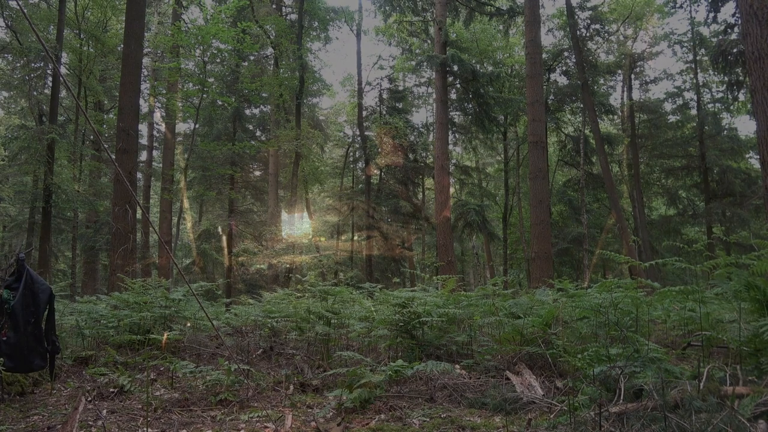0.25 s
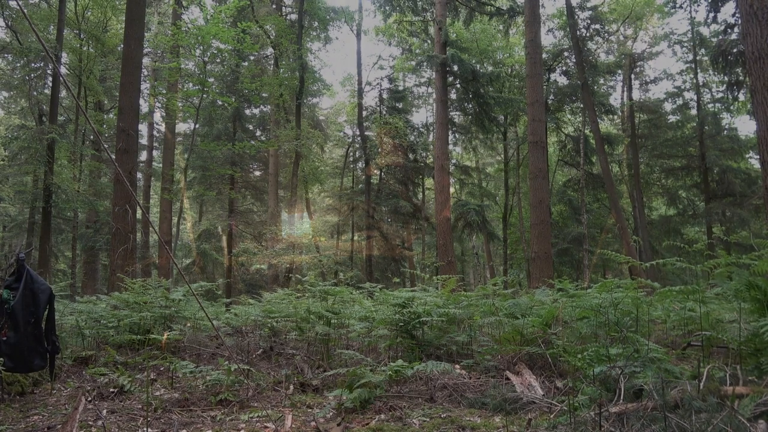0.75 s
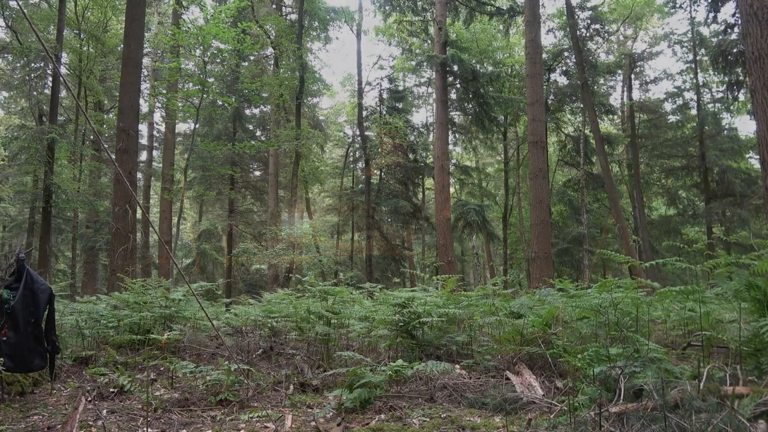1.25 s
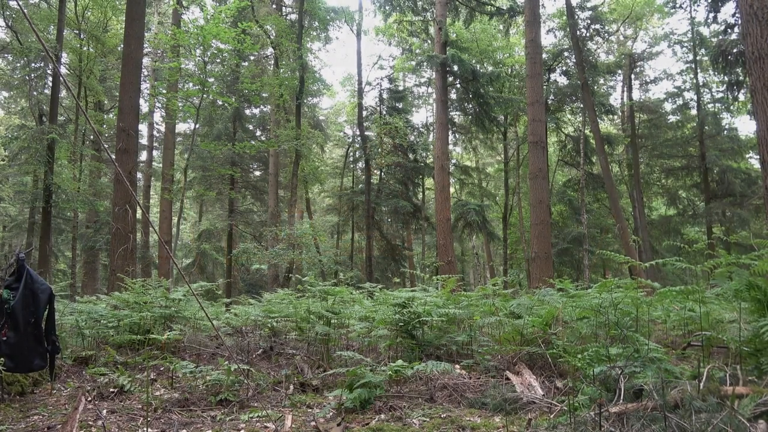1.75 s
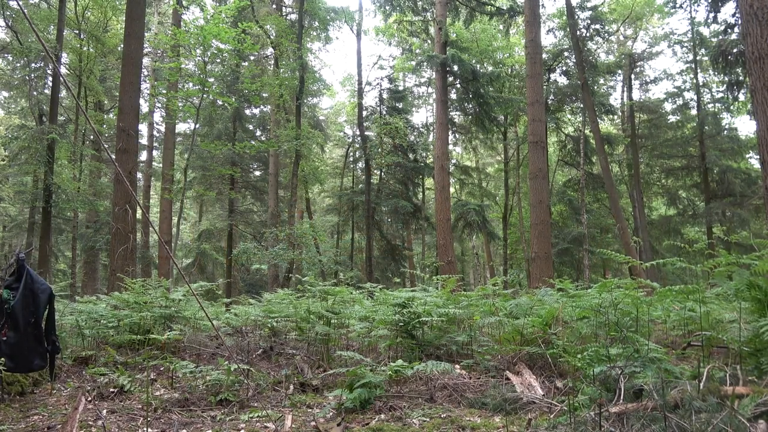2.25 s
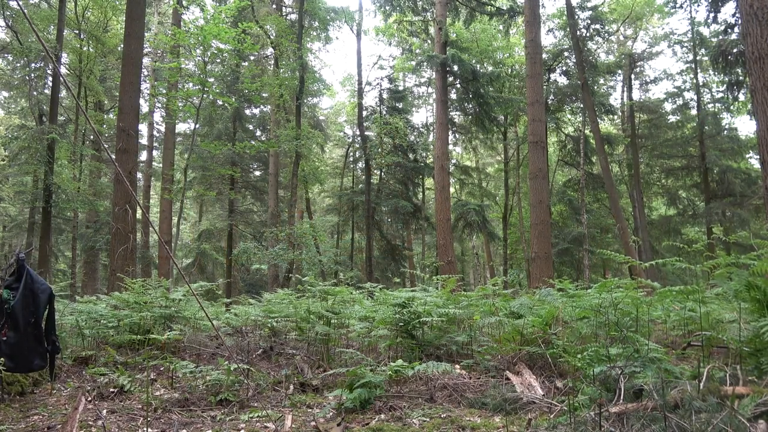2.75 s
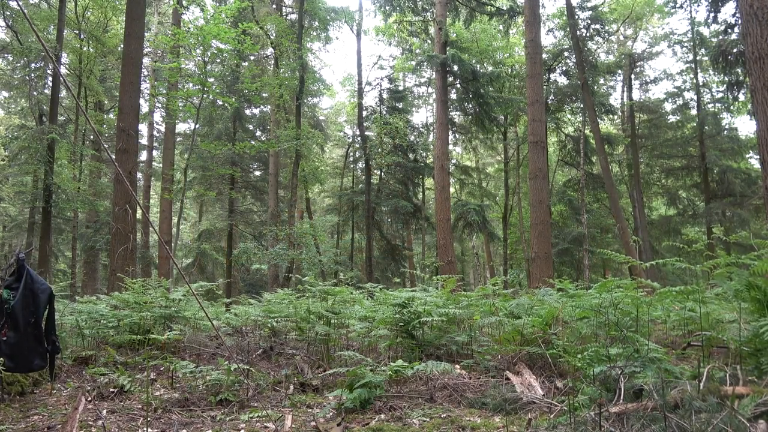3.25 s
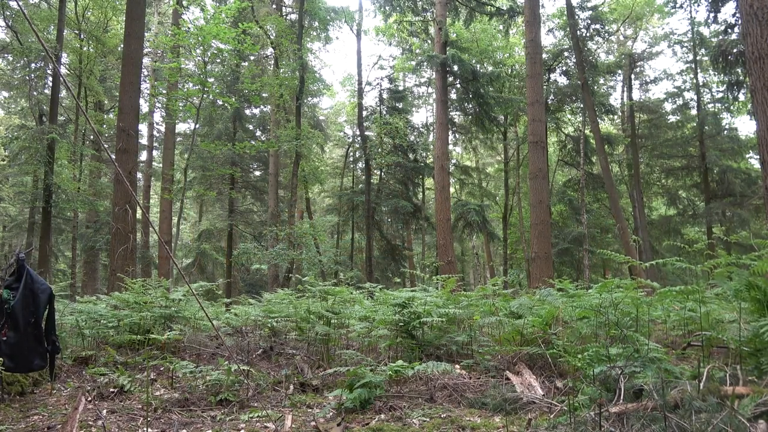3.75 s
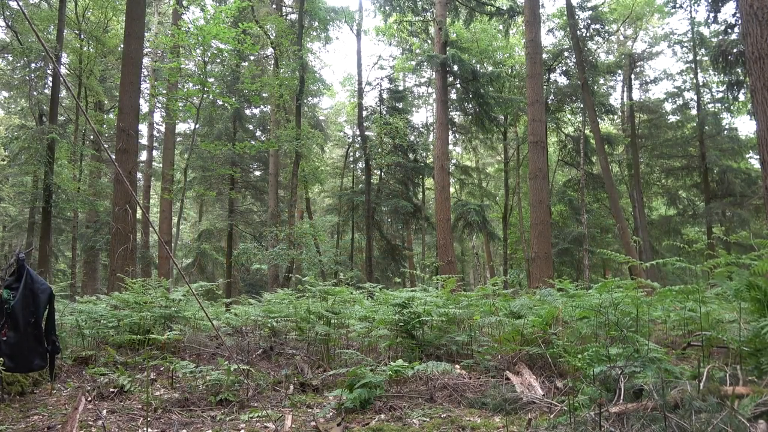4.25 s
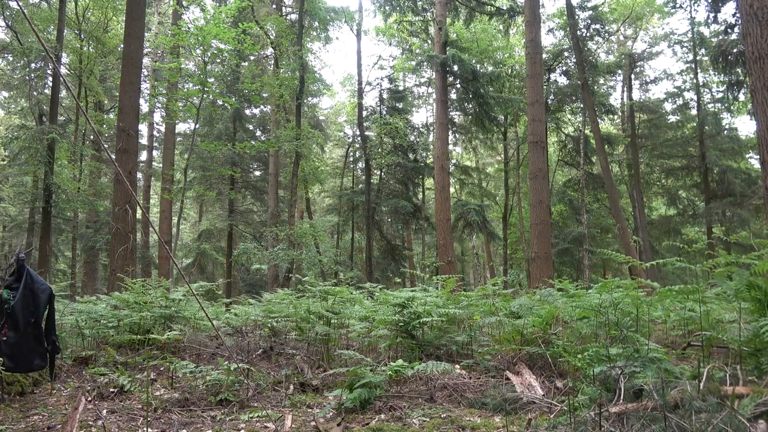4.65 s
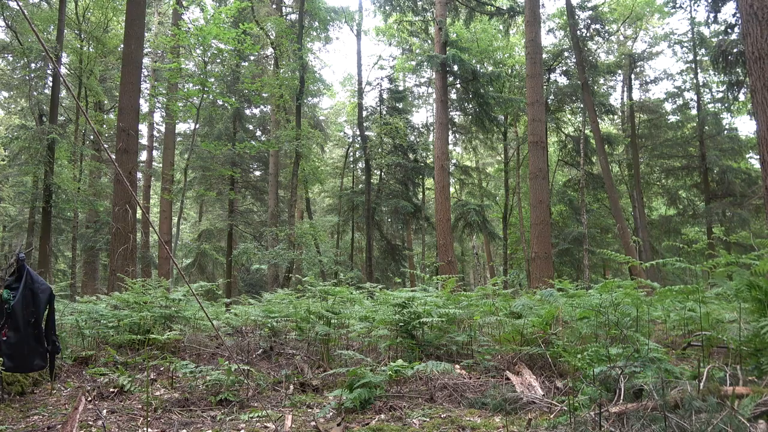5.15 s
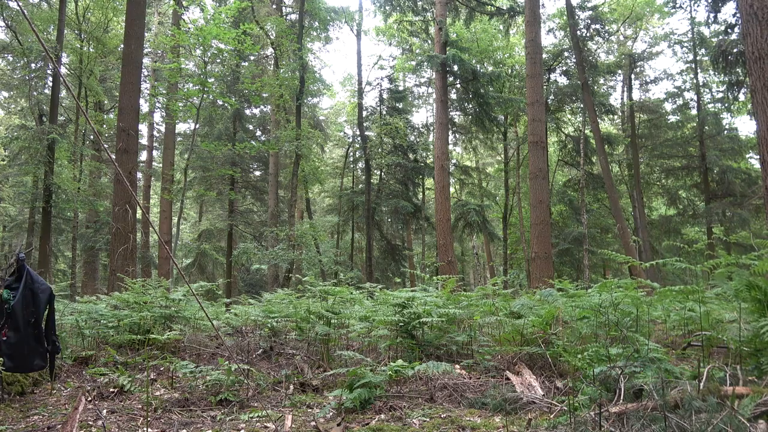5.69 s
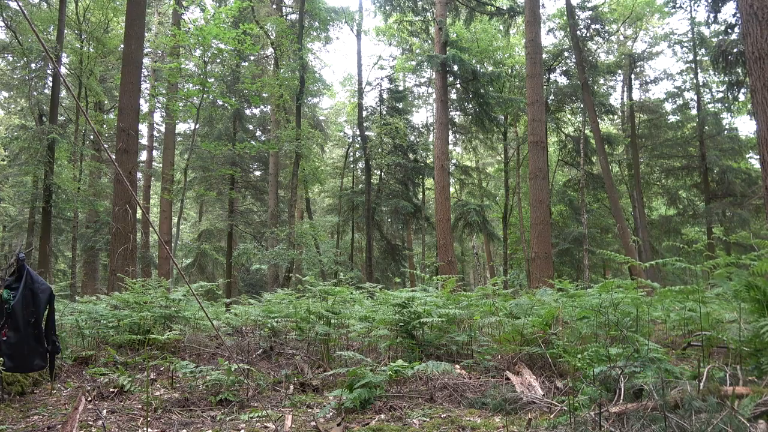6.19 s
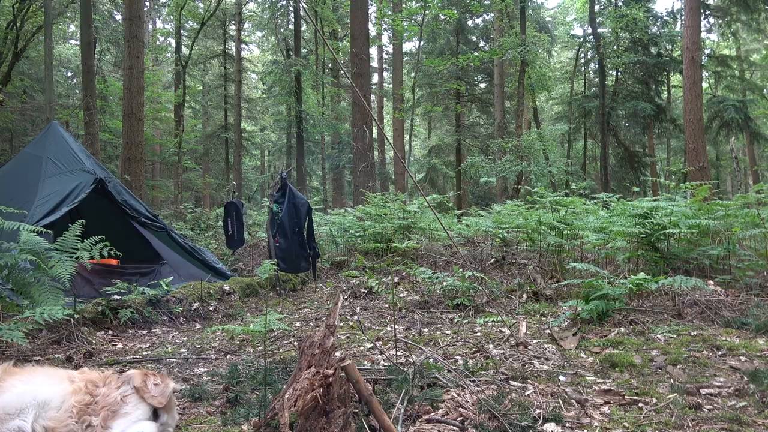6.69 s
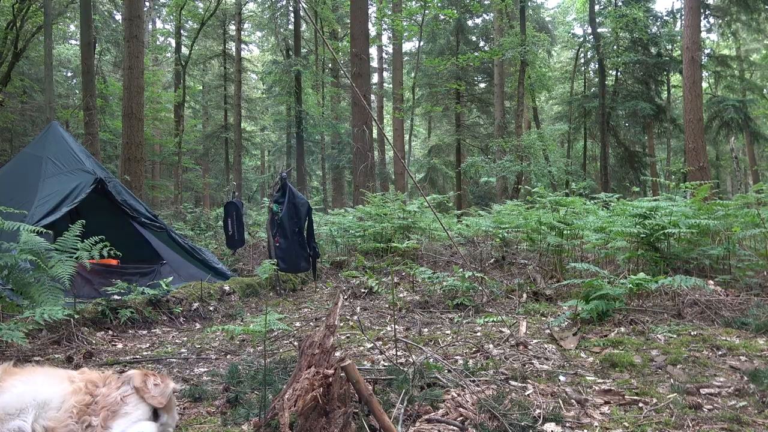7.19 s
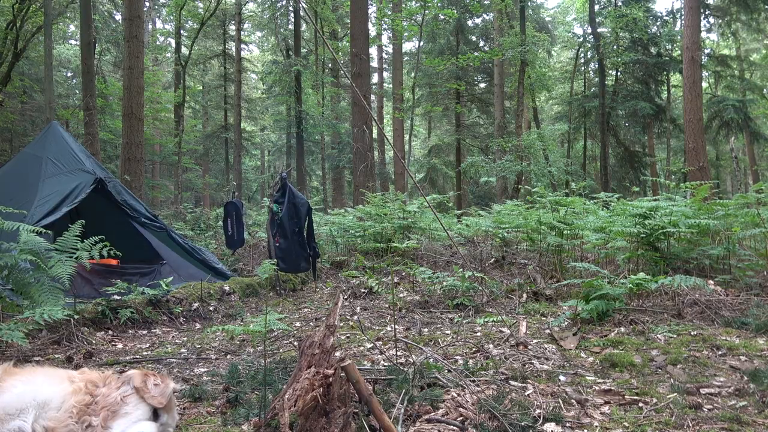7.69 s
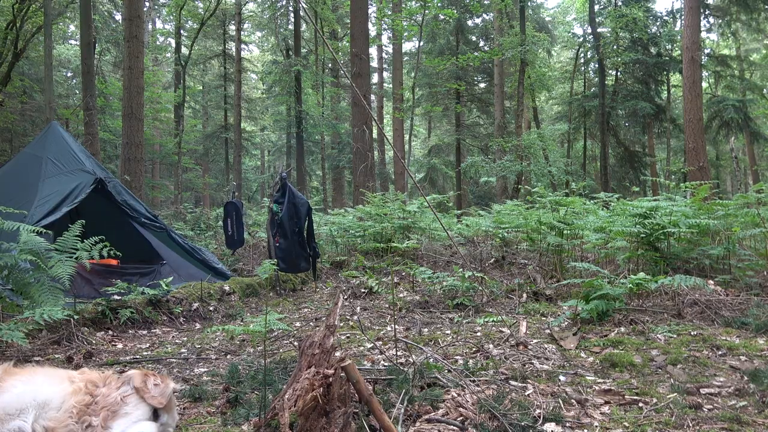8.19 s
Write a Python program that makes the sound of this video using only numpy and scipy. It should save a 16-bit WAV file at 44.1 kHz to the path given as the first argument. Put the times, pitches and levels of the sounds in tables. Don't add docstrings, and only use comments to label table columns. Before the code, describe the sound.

Wide outdoor stereo of calm woodland: low distant traffic hum and airy hiss rise gently at first. A remote cuckoo calls steadily, a short higher note then a longer lower one, with soft echoes. Irregular crisp drips tap leaves close by, thin clear whistles come from a small bird, and soft wind puffs nudge the microphone. Rapid distant chirps and trills cluster in the last second.

```python
import sys
import numpy as np
from scipy import signal
from scipy.io import wavfile
from scipy.ndimage import uniform_filter1d

SR = 44100
rng = np.random.default_rng(int(sys.argv[2]) if len(sys.argv) > 2 else 0)


def gain_from_decibels(decibels):
    exponent = np.asarray(decibels, float) / 20
    return 10 ** exponent


def output_pcm(signal):
    pcm = np.clip(np.atleast_2d(signal).T, -1, 1) * 32767
    wavfile.write(sys.argv[1], SR, np.round(pcm).astype(np.int16))


N = 371763

# (frequency [Hz], density [dB per Hz])
AIR_SPECTRUM = [(12, -10), (25, -3.5), (60, -1.5), (110, 1.5), (170, -5.5), (300, -6), (450, -3.5),
                (750, -1.5), (1200, -1), (1700, -8.5), (2400, -12), (3400, -17.5), (7000, -21.5),
                (15500, -25)]
# (frequency [Hz], side minus centre [dB])
AIR_WIDTH = [(25, 1), (45, -5), (100, -18), (200, -7.5), (380, -9), (700, -12.5), (1290, -15.5),
             (2380, -5.5), (4400, 0.5), (15000, 1.8)]
# (frequency [Hz], share of the swell [0-1])
ROAD_SHARE = [(30, .4), (130, .8), (300, .25), (1200, 1), (3000, .72), (7000, .05)]
# (time [s], level [dB])
TRAFFIC = [(0, -.8), (1, .8), (1.4, -.3), (2.1, .3), (2.8, -2.4), (3.6, .4), (4.3, .3), (5.1, -1.6),
           (5.8, .6), (6.5, 1.6), (7.3, 1.4), (8.1, 2.8), (8.43, 3.6)]

# (delay [s], level [dB])
TRUNK_ECHOES = [(.032, -16), (.088, -13.5), (.205, -15.5), (.46, -22)]
# (frequency [Hz], time to fall 60 dB [s])
WOOD_DECAY = [(300, 1.5), (1000, 1.3), (3500, .9), (4700, 1.25), (9000, .6)]

# (start [s], end [s], start pitch [Hz], end pitch [Hz], level [dB])
CLEAR_NOTES = [ (.039, .13, 3690, 4130, -71), (.096, .161, 4800, 4380, -73), (.28, .48, 3500, 3410, -72),
               (.25, .297, 4480, 4500, -74), (1.48, 1.545, 3750, 3950, -68), (6.346, 6.42, 3450, 3424, -66),
               (6.722, 6.8, 3270, 3230, -69), (7.658, 7.702, 3300, 3000, -59),
               (7.83, 7.92, 7325, 7340, -61.5), (7.895, 7.912, 4100, 3800, -53),
               (7.908, 8.012, 3765, 3740, -43.5), (8.282, 8.297, 8300, 8700, -63),
               (8.32, 8.34, 7600, 7520, -56), (8.334, 8.361, 7100, 6760, -53.5),
               (8.355, 8.38, 6500, 6000, -52), (8.38, 8.394, 5750, 5680, -51),
               (8.379, 8.42, 7600, 7600, -60), ]
# (start [s], end [s], start pitch [Hz], end pitch [Hz], level [dB])
BURRED_NOTES = [ (.161, .24, 3600, 3520, -68), (6.15, 6.206, 4270, 4170, -65),
                (6.259, 6.495, 4320, 4234, -59.5), (7.042, 7.238, 4100, 4170, -63),
                (7.065, 7.42, 4530, 4450, -60), (7.509, 7.575, 2970, 4120, -61),
                (7.688, 7.72, 3720, 4270, -54.5), (7.72, 7.784, 3650, 3850, -58),
                (7.7, 7.77, 2980, 2900, -62), (8.01, 8.04, 5380, 5250, -64),
                (8.029, 8.107, 4450, 4540, -52), (8.099, 8.158, 3880, 4040, -50),
                (8.308, 8.357, 4160, 4220, -54), (8.26, 8.323, 7800, 8150, -62),
                (8.385, 8.428, 6100, 6400, -57), (7.876, 7.887, 6700, 5400, -53), ]
# (start [s], end [s], start pitch [Hz], end pitch [Hz], level [dB])
TRILLED_NOTES = [ (.504, .62, 4300, 4140, -70.5), (.675, .743, 4510, 4300, -70.5),
                 (7.708, 7.81, 4390, 4410, -46), (7.81, 7.895, 4330, 4480, -51.5),
                 (8.035, 8.107, 3700, 3860, -52), (8.145, 8.225, 4030, 4190, -49.5),
                 (8.22, 8.307, 4220, 4160, -52), (8.133, 8.24, 3080, 3020, -61.5),
                 (7.883, 7.925, 5400, 5300, -54), ]
# (start [s], end [s], start pitch [Hz], end pitch [Hz], level [dB])
BUZZED_NOTES = [(5.9, 6.005, 3310, 2890, -67), (6.077, 6.251, 3010, 4190, -70),
                (7.559, 7.64, 3470, 4100, -63), (7.888, 7.93, 5950, 5750, -57),
                (8.246, 8.262, 6600, 4600, -58), (8.01, 8.36, 4000, 4300, -58),
                (.31, .325, 4800, 3300, -66)]
# (start [s], start pitch [Hz], level [dB])
CHIRPS = [(5.672, 3490, -62), (5.815, 2720, -60), (5.864, 3550, -58.5), (6.015, 2790, -60),
          (6.055, 3490, -62.5)]

# (lowest point [s], hold [s], lowest pitch [Hz], held pitch [Hz], level [dB])
WHISTLES = [
    (1.126, .16, 3700, 4750, -55.5),
    (1.555, .17, 3400, 4680, -47.5),
    (2.702, .168, 3550, 4625, -49.5),
    (6.515, .2, 3220, 4540, -51.5),
]
# (start [s], top pitch [Hz], level [dB])
PEEPS = [
    (.37, 8250, -64),
    (1.13, 8450, -66),
]
# (time [s], pitch from top [Hz], level [dB])
PEEP_SHAPE = [(0, -390, -13), (.025, 0, 0), (.045, -340, -6), (.06, -60, -11)]

# (start [s], upper note level [dB], its closing accent [dB], lower note level [dB],
# upper note tuning [factor])
SONGS = [
    (.422, -44.5, -3, -45.5, 1.001),
    (1.772, -41.5, 3, -41.3, 1.002),
    (3.189, -38.5, -6, -41.5, .995),
    (4.44, -43.5, 9, -41, 1.015),
    (5.736, -39, 0, -42, 1.003),
    (7.079, -40.5, 4, -40.8, 1.004),
]
# (share of the note [0-1], pitch [Hz])
UPPER_PITCH = [(0, 645), (.15, 688), (.35, 712), (.6, 724), (.85, 700), (1, 685)]
# (share of the note [0-1], pitch [Hz])
LOWER_PITCH = [(0, 530), (.15, 536.5), (.5, 539), (.8, 543), (1, 540)]

# (time [s], peak level [dB], lower ring [Hz], upper ring [Hz], upper ring level [dB])
DRIPS = [(.4978, -30.5, 4800, 8300, 0), (1.268, -33, 5400, 9250, -4.5), (1.3024, -42, 5270, 12100, -2),
         (1.3653, -50, 4800, 10000, -9), (1.5164, -46, 4820, 9180, -7), (1.5629, -30, 5430, 11700, -4),
         (1.8793, -37, 6800, 10560, -3), (1.9555, -46, 5530, 8930, -1), (2.038, -41, 7140, 8370, -1),
         (2.6, -41, 5500, 12000, 1), (2.9478, -31, 6450, 8570, -5), (3.0797, -22.5, 5900, 7200, -8),
         (3.1642, -38.5, 6020, 9840, -2), (3.4767, -43, 6770, 9980, 1), (5.119, -37.5, 5920, 10000, -3),
         (5.2086, -40, 7050, 10400, -5), (6.386, -33, 5700, 9160, -6), (6.7431, -40.5, 5840, 9550, -11),
         (6.8183, -40, 6810, 12040, 3), (6.995, -43, 5210, 10200, -3), (7.01, -34.5, 6040, 9440, 1),
         (7.025, -42, 5420, 12500, -12), (7.414, -47, 7100, 9160, -15)]
# (frequency [Hz], level [dB], time to fall 60 dB [s])
LEAF_THUD = [(660, -11, 0.045), (1400, -5, 0.0041), (3400, -6, 0.0053), (4510, -17, 0.043)]

# (centre [s], level [dB])
GUSTS = [
    (1.42, -73),
    (3.501, -62),
    (5.15, -60),
    (7.15, -56.5),
    (8.398, -69),
]
INSECT_STARTS = [1.35, 3.93, 4.359, 5.34, 5.94, 7.9]

AIR_DB = -52.5
FADE_DB, FADE_S, CREEP_DB_PER_S = -6, 2.3, .3

TRILL_HZ, THROB_HZ, THROB_DB = 165, 29, 4.5
CLEAR_HZ, BURR_HZ, TRILLED_HZ, BUZZ_HZ = 16, 62, 118, 300
ROUGH_HZ, ROUGH_SHARE = 14, .26
GRAIN_PER_HZ = .005
NEAR_DB, BLUR = -55, .3
CHIRP_S, CHIRP_RISE = .022, 1.16
HIGH_SINGER_HZ = 5000
LOW_PAN_DB, HIGH_PAN_DB, DRIP_PAN_DB = -0.5, 6, -2
SMALL_BIRD_ECHO_DB = -10
WHISTLE_WET_DB, LOW_WET_DB, HIGH_WET_DB = -10, -9, -3

LEAD_S, LEAD_DB, DROP_HZ_PER_S = .032, -10, 53000
CLIMB_S, CREEP_HZ_PER_S = .025, 30
DB_PER_KHZ, TIRE_DB_PER_S = -10, -38
FLUTTER_HZ, FLUTTER_DB = 34, 2.3

# length [s], start level [dB], rise [s], ending [s]
UPPER_SHAPE, LOWER_SHAPE = (.088, -22, .014, .012), (.198, -15, .028, .025)
WAIT_S, LOWER_END_DB = .377, -10.5
UPPER_WET_DB, LOWER_WET_DB = -14.5, -20

RUSTLE_DB, HEAVY_DB, RUSTLE_GROWTH = -21.5, -30, .8
THUD_DB = -10
INSECT_HZ, INSECT_DB, INSECT_S = 12720, -79, .11
CUT_S, CUT_WIDTH_S, CUT_DB = 6.562, .005, -9
EDGE_HZ = 15830


def read(points, hz):
    f, value = np.transpose(points)
    return np.interp(np.log(hz + 1), np.log(f + 1), value)


def evened(x):
    return x / np.sqrt(np.mean(x ** 2) + 1e-20)


def add(mix, s, sound):
    part = mix[..., round(s * SR):][..., :sound.shape[-1]]
    part += sound[..., :part.shape[-1]]


def sung(hz, db):
    hz, db = (uniform_filter1d(c, size=150, mode="nearest") for c in (hz, db))
    tone = np.sin(2 * np.pi * np.cumsum(hz) / SR)
    return np.sqrt(2) * gain_from_decibels(db) * tone * signal.windows.tukey(len(hz), .12)


def panned(x, pan_db):
    return np.array([x * gain_from_decibels(pan_db / 2), x * gain_from_decibels(-pan_db / 2)])


def wood(x, wet_db, echo_db, same):
    taps = np.zeros((2, SR))
    at = np.arange(600, SR - 20, 20) + rng.integers(0, 20, (2, (SR - 601) // 20))
    np.put_along_axis(taps, at, rng.choice([-1., 1.], at.shape), 1)
    hz, t, z = signal.stft(taps, SR, nperseg=256)
    decay = gain_from_decibels(-60 * t / read(WOOD_DECAY, hz)[:, None])
    mid, side = signal.istft(z * decay, SR, nperseg=256)[1]
    side = side * np.sqrt(1 - np.clip(same, 0, 1))
    tail = gain_from_decibels(wet_db) * np.array([mid + side, mid - side]) / np.linalg.norm(mid)
    for delay, db in TRUNK_ECHOES:
        tail[:, round(delay * SR)] += gain_from_decibels(db + echo_db)
    return signal.fftconvolve(x[None], tail, axes=1)[:, :N]


def air():
    frames, hz = N // 256 + 5, np.fft.rfftfreq(1024, 1 / SR)
    a, b, c, d, patches = rng.standard_normal((frames, 513, 5)).T
    patches = evened(uniform_filter1d(uniform_filter1d(patches, 10, 0), 20, 1))
    t = np.arange(frames) * 256 / SR
    fade = FADE_DB * np.maximum(1 - t / FADE_S, 0) + CREEP_DB_PER_S * t
    db = read(AIR_SPECTRUM, hz)[:, None] + 0.67 * patches
    mid = (a + 1j * b) * gain_from_decibels(db)
    side = (c + 1j * d) * gain_from_decibels(db + read(AIR_WIDTH, hz)[:, None])
    scale = gain_from_decibels(AIR_DB) / np.std(signal.istft(mid, nperseg=1024, noverlap=768)[1])
    traffic = np.interp(t, *np.transpose(TRAFFIC))
    swell = gain_from_decibels(fade + np.outer(read(ROAD_SHARE, hz), traffic))
    stereo = swell * np.array([mid + side, mid - side])
    return scale * signal.istft(stereo, nperseg=1024, noverlap=768)[1][:, :N]


def far_notes():
    chirps = [(s, s + CHIRP_S, hz, hz * CHIRP_RISE, db) for s, hz, db in CHIRPS]
    voices = [(CLEAR_NOTES + chirps, CLEAR_HZ), (BURRED_NOTES, BURR_HZ),
              (TRILLED_NOTES, TRILLED_HZ), (BUZZED_NOTES, BUZZ_HZ)]
    return [(*row, trill) for rows, trill in voices for row in rows]


def far_singers():
    notes = far_notes()
    dry, wet = np.zeros((2, N)), np.zeros((2, N))
    phases = rng.random((len(notes), 2))
    wobble = rng.standard_normal(N)
    wobble = evened(uniform_filter1d(uniform_filter1d(wobble, size=120), size=120))
    for (s0, s1, hz0, hz1, db, trill), (beat_phase, tone_phase) in zip(notes, phases):
        t = np.arange(s0, s1, 1 / SR)
        beat = 2 * np.pi * (TRILL_HZ * t + beat_phase)
        rough = (ROUGH_HZ + ROUGH_SHARE * trill) * wobble[round(s0 * SR):][:len(t)]
        hz = np.linspace(hz0, hz1, len(t)) + trill * np.sin(beat) + rough
        tone = np.sin(2 * np.pi * (np.cumsum(hz) / SR + tone_phase))
        grain = 1 + np.clip(GRAIN_PER_HZ * trill, 0, .9) * np.cos(beat)
        throb = gain_from_decibels(THROB_DB * np.cos(2 * np.pi * THROB_HZ * (t - s0 - .016)))
        note = np.sqrt(2) * gain_from_decibels(db) * grain * throb * tone * signal.windows.tukey(len(t), .3)
        far_db = np.clip(BLUR * (NEAR_DB - db), 0, 6)
        singer = int(hz0 > HIGH_SINGER_HZ)
        add(dry[singer], s0, note * gain_from_decibels(-far_db))
        add(wet[singer], s0, note * gain_from_decibels(far_db))
    direct = panned(dry[0], LOW_PAN_DB) + panned(dry[1], HIGH_PAN_DB)
    low_wood = wood(wet[0], LOW_WET_DB, SMALL_BIRD_ECHO_DB, same=0.18)
    high_wood = wood(wet[1], HIGH_WET_DB, SMALL_BIRD_ECHO_DB, same=.2)
    return direct + low_wood + high_wood


def whistler():
    out = np.zeros(N)
    for s, hold, low_hz, held_hz, db in WHISTLES:
        t = np.arange(-LEAD_S, hold, 1 / SR)
        short = (held_hz - low_hz) * np.exp(-np.maximum(t, 0) / CLIMB_S)
        climb = held_hz - short + CREEP_HZ_PER_S * t
        hz = np.where(t < 0, low_hz - DROP_HZ_PER_S * t, climb)
        dip_db = DB_PER_KHZ * short / 1000
        lead_db = np.interp(t, [-LEAD_S / 2, 0], [LEAD_DB, dip_db[0]])
        flutter_db = FLUTTER_DB * np.sin(2 * np.pi * FLUTTER_HZ * t)
        held_db = dip_db + TIRE_DB_PER_S * t + flutter_db
        add(out, s - LEAD_S, sung(hz, db + np.where(t < 0, lead_db, held_db)))
    s, bend, shape_db = np.transpose(PEEP_SHAPE)
    t = np.arange(0, s[-1], 1 / SR)
    for start, hz, db in PEEPS:
        add(out, start, sung(hz + np.interp(t, s, bend), db + np.interp(t, s, shape_db)))
    return out + wood(out, WHISTLE_WET_DB, SMALL_BIRD_ECHO_DB, same=0.54)


def cuckoo_note(pitch, shape, tuning, db, end_db):
    length, start_db, rise, fall = shape
    t = np.arange(0, length, 1 / SR)
    level = db + start_db * np.exp(-t / rise) + end_db * np.exp((t - length) / fall)
    return sung(tuning * np.interp(t / length, *np.transpose(pitch)), level)


def cuckoo():
    upper, lower = np.zeros((2, N))
    for s, upper_db, accent_db, lower_db, tuning in SONGS:
        add(upper, s, cuckoo_note(UPPER_PITCH, UPPER_SHAPE, tuning, upper_db, accent_db))
        add(lower, s + WAIT_S, cuckoo_note(LOWER_PITCH, LOWER_SHAPE, 1, lower_db, LOWER_END_DB))
    upper_wood = wood(upper, UPPER_WET_DB, echo_db=-1.5, same=0.94)
    lower_wood = wood(lower, LOWER_WET_DB, echo_db=-12, same=1.0)
    return upper + lower + upper_wood + lower_wood


def drips():
    out, t = np.zeros((2, N)), np.arange(3500) / SR
    crack, left, right = rng.standard_normal((len(DRIPS), 3, len(t))).transpose(1, 0, 2)
    bright = signal.butter(2, [2600, 7500], "bandpass", fs=SR)
    sharp = signal.butter(1, [2500, 11000], "bandpass", fs=SR)
    thud = sum(gain_from_decibels(db - 60 * t / t60) * np.sin(2 * np.pi * hz * t) for hz, db, t60 in LEAF_THUD)
    shape = np.minimum(t / .00025, 1) * gain_from_decibels(-60 * t / .006)
    for k, (s, peak_db, low_hz, high_hz, high_db) in enumerate(DRIPS):
        growth_db = RUSTLE_GROWTH * max(peak_db - HEAVY_DB, 0)
        high = np.clip(gain_from_decibels(high_db), 0, .95)
        low_ring = np.sqrt(1 - high ** 2) * np.sin(2 * np.pi * low_hz * t)
        high_ring = high * np.sin(2 * np.pi * high_hz * t)
        snap = shape * (low_ring + high_ring + 1.8 * high * signal.lfilter(*sharp, crack[k]))
        hit = snap / abs(snap).max() + gain_from_decibels(THUD_DB + growth_db) * thud
        rustle = signal.lfilter(*bright, [left[k] + 0.53 * right[k], left[k] - 0.95 * right[k]])
        rustle = rustle * np.minimum(t / 0.00073, 1) * gain_from_decibels(RUSTLE_DB + growth_db - 60 * t / 0.12)
        add(out, s + 0.00033, gain_from_decibels(peak_db) * (panned(hit, DRIP_PAN_DB) + rustle))
    return out


def gusts():
    out, noise = np.zeros((2, N)), rng.standard_normal((len(GUSTS), 2, 7000))
    low = signal.butter(2, [22, 85], "bandpass", fs=SR, output="sos")
    for (s, db), (a, b) in zip(GUSTS, noise):
        rumble = evened(signal.sosfilt(low, [a + 0.49 * b, a - .6 * b]))
        add(out, s - .08, gain_from_decibels(db) * rumble * np.hanning(len(a)))
    return out


def insect():
    out, t = np.zeros(N), np.arange(0, INSECT_S, 1 / SR)
    tone = np.sqrt(2) * np.sin(2 * np.pi * INSECT_HZ * t)
    buzz = gain_from_decibels(INSECT_DB) * tone * signal.windows.tukey(len(t), .5)
    for s in INSECT_STARTS:
        add(out, s, buzz)
    return out


def scene():
    return air() + far_singers() + whistler() + cuckoo() + drips() + gusts() + insect()


def low_pass(x):
    return signal.sosfilt(signal.butter(12, 16720, fs=SR, output="sos"), x)


def record(dry):
    t = np.arange(N) / SR
    dip = gain_from_decibels(CUT_DB * np.exp(-((t - CUT_S) / CUT_WIDTH_S) ** 2))
    edge = signal.firwin(1501, EDGE_HZ, window=("kaiser", 9), fs=SR)
    mix = signal.oaconvolve(dry * dip, edge[None], "same")
    return low_pass(mix)


dry = scene()
out = record(dry)
output_pcm(out)
```